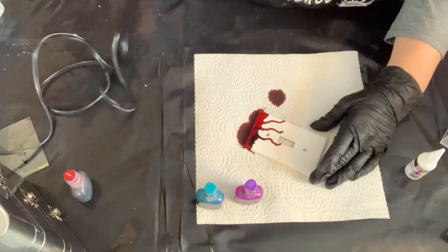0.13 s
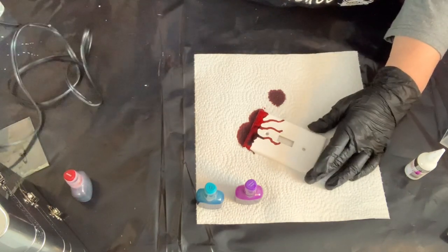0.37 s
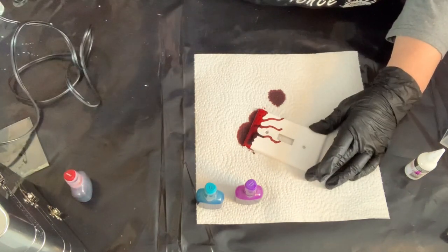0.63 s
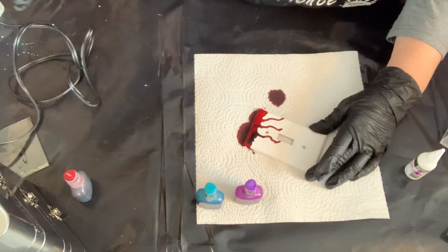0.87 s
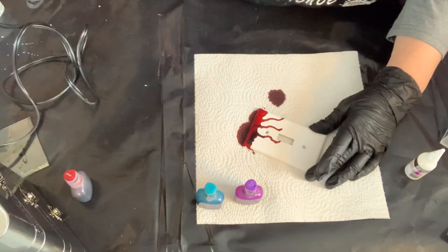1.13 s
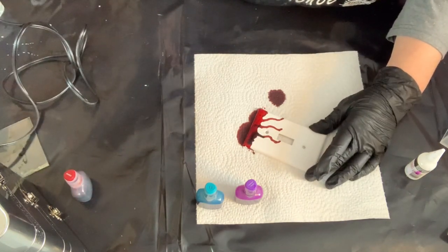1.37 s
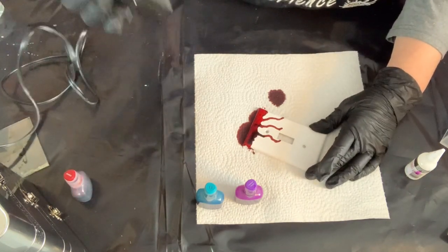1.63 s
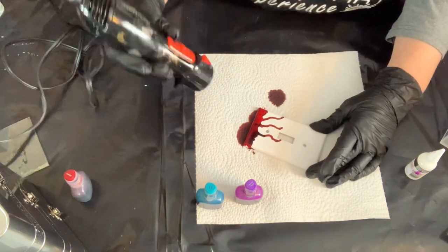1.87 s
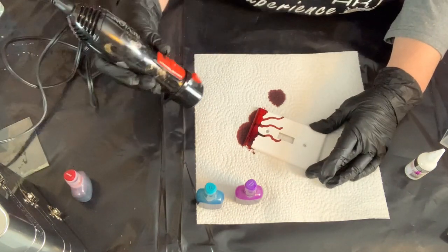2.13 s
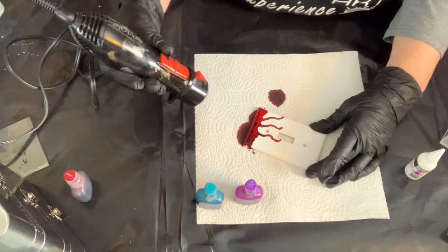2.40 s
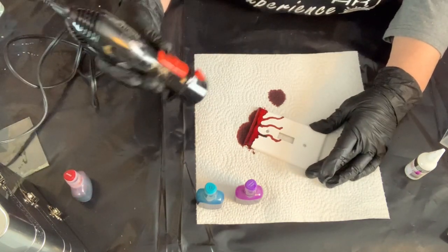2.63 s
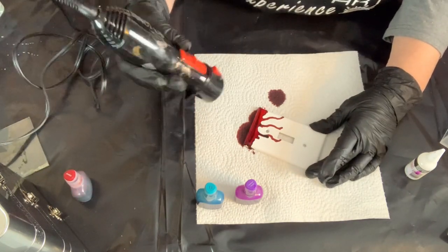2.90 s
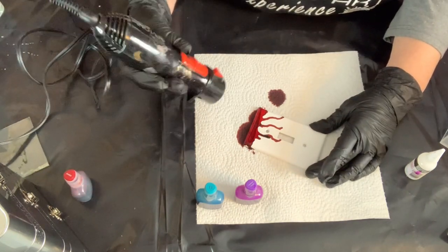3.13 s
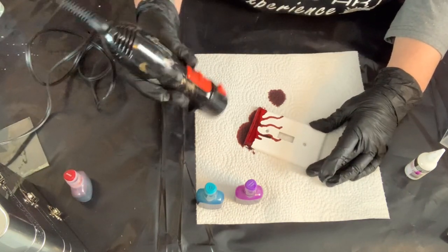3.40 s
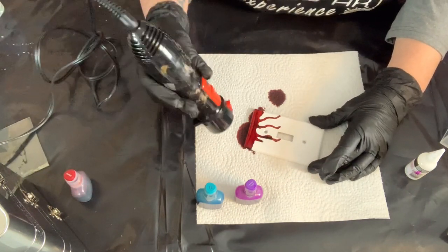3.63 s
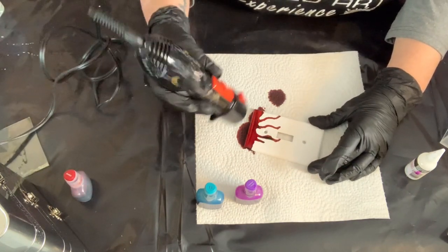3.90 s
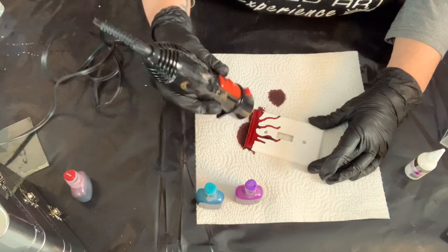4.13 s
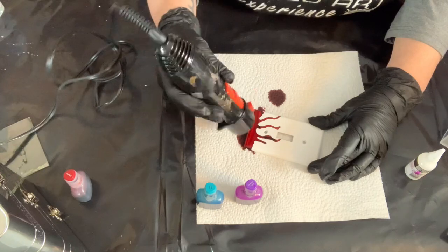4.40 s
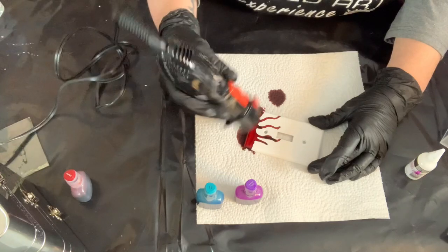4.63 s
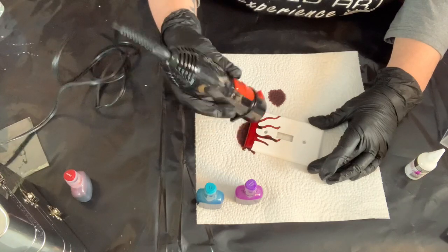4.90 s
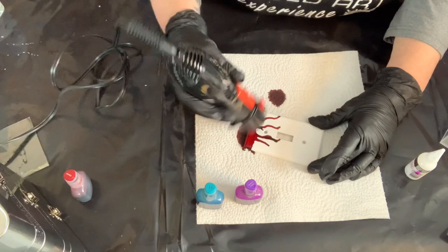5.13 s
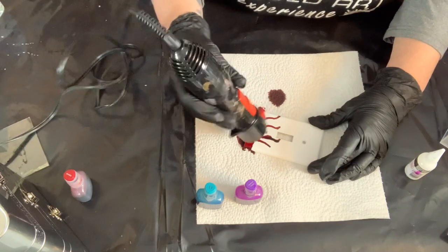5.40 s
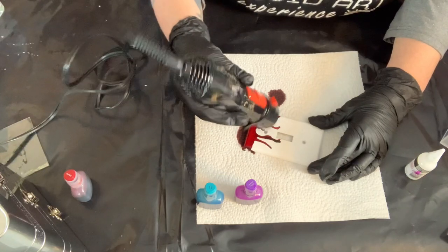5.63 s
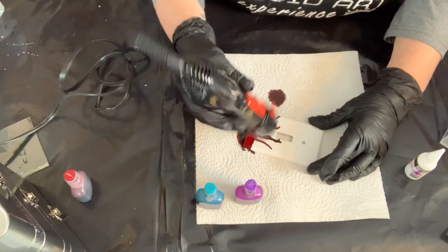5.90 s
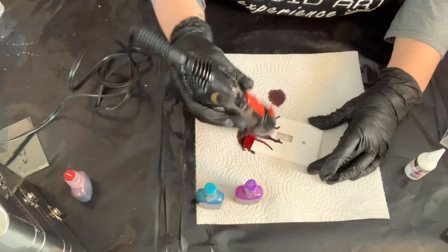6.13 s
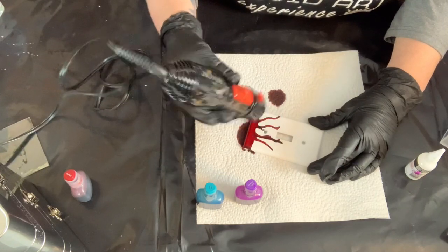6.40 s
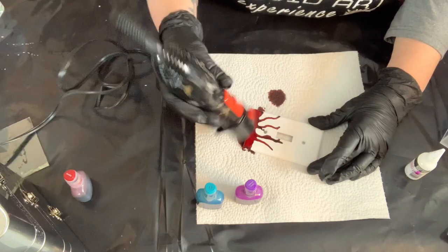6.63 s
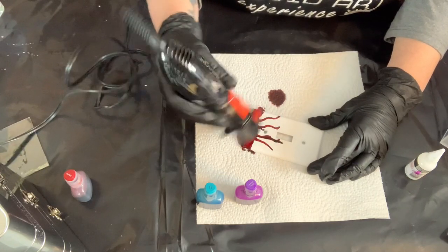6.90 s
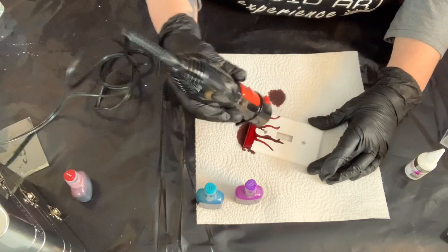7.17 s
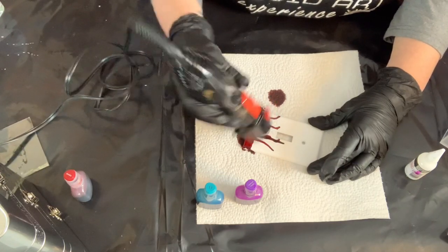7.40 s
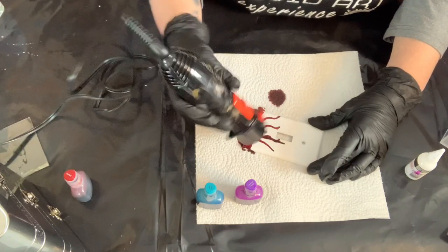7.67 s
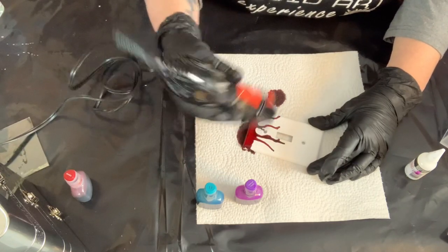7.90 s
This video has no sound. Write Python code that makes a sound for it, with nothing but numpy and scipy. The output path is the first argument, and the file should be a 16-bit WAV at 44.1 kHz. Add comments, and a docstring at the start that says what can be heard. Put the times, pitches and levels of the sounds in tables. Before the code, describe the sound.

Faint cord rustles in a quiet room, a sharp plastic click, and a little electric blower winds up quickly, then runs on with hissing air.

```python
"""First a cord scrapes, rustles and taps on a plastic sheet, over the faint hiss and rumble of a quiet room.
Then the switch of a small handheld electric blower snaps, its motor winds up, and the fan roars and hisses.
Coloured noise makes cord, air and room; ringing plastic modes make the taps and snaps; sines at multiples
of the shaft speed make the thin tones. The hand carries the tool about under a pair of microphones."""
import sys
import numpy as np
from scipy import signal
from scipy.fft import rfft, irfft, next_fast_len
from scipy.io import wavfile
from scipy.ndimage import uniform_filter1d

SR = 44100
rng = np.random.default_rng(int(sys.argv[2]) if len(sys.argv) > 2 else 0)


def digitize_waveform(pressure):
    """Quantize a signal to 16-bit integers and store it at the path in sys.argv[1].

    Rows of a 2-D input are taken as channels; values are limited to [-1, 1].
    """
    field = np.atleast_2d(pressure).T
    bounded = np.clip(field, -1, 1)
    quanta = np.round(bounded * 32767).astype(np.int16)
    wavfile.write(sys.argv[1], SR, quanta)


def amplitude_ratio(level_db):
    """Convert a level in decibels to the matching linear amplitude (field) ratio."""
    exponent = np.asarray(level_db, float) / 20
    return 10 ** exponent


N = 354123
FRAME, HOP, SIZE = 1024, 256, next_fast_len(N)  # samples
FRAME_HZ = np.fft.rfftfreq(FRAME, 1 / SR)
FRAME_S = np.arange(N // HOP + 5) * HOP / SR
TIME = np.arange(N) / SR


def evened(x):
    """Normalisation to equal power: scales to rms 1."""
    return x / np.sqrt(np.mean(np.abs(x) ** 2) + 1e-20)


def read(points, hz):
    """Pitch scale: reads a spectrum table on a log-frequency axis."""
    f, value = np.transpose(points)
    return np.interp(np.log(hz + 1), np.log(f + 1), value)


def curves(rows, t):
    """Envelopes: columns of a time table, joined by straight lines."""
    s, *columns = np.transpose(rows)
    return [np.interp(t, s, c) for c in columns]


def wander(rate, count):
    """Superposition of slow sines up to rate [Hz]: chance curves of rms 1, one a row."""
    t = np.arange(0, N, HOP) / SR
    f = np.geomspace(rate / 8, rate, 20)[:, None]
    rows = []
    for phase in rng.random((count, 20)):
        waves = np.sin(2 * np.pi * (f * t + phase[:, None])) / np.sqrt(f)
        rows.append(np.interp(TIME, t, evened(waves.sum(0))))
    return np.array(rows)


def speed(t):
    """First-order lag: share of full speed as the motor winds up exponentially."""
    start_s, wind_up_s = 1.338, .365
    return 1 - np.exp(-np.maximum(t - start_s, 0) / wind_up_s)


# the hand lowers the nozzle towards the paper and carries the tool about:
# (time [s], lowered [0-1], level of the air and housing noise [dB])
HAND = [(1.3, 0, 0), (1.7, 0, 0), (2.15, 0, 2), (2.55, 0, 0), (3.3, .05, 0), (3.7, .7, -1), (4.3, .8, 0),
        (5, .9, .5), (6, .9, -.5), (7, 1, 0), (8.03, 1, 0)]
# likeness of diffuse sound at the two microphones: (frequency [Hz], likeness [0-1])
LIKENESS = [(40, .85), (120, .94), (300, .98), (550, .92), (900, .93), (1250, .72), (1900, .88),
            (3000, .72), (4500, .5), (6000, .45)]
# balance of the microphones: (frequency [Hz], right over left [dB])
RIGHT_OVER_LEFT = [(100, .5), (700, -.8), (1300, -.3), (2400, 1.4), (4400, 3), (6500, 1), (7500, 0)]
# phase by which the right side trails besides its lag: (frequency [Hz], phase [rad])
RIGHT_TRAILS = [(40, .3), (130, .9), (300, .15), (600, 0), (1000, .4), (2000, -.3), (4000, -.7)]
# fixed resonances that colour the noise, before scaling by ringing: (frequency [Hz], width [Hz], lift [dB])
RESONANCES = [(305.8, 10, 5.5), (440, 58, 5.5), (624, 30, 5), (754, 39, 3.5), (810, 40, 2),
              (936, 45, 5), (1010, 30, -3), (1060, 30, 3), (1627, 37, 11.5), (1730, 75, 7.5),
              (1905, 24, 11.5), (2145, 120, 8.5), (2328, 24, 14.5), (2963, 102, 9), (4910, 94, 5)]
LAG_HIGH, LAG_LOW = 10, 6  # samples by which the right microphone hears later, nozzle high and low


def noise(layers, patchy_db, ringing=1):
    """Partial coherence: one patchy noise at both microphones, filtered into (spectrum, level [dB]) layers."""
    a, b, c, d, patches = rng.standard_normal((5, len(FRAME_HZ), len(FRAME_S)))
    patches = uniform_filter1d(uniform_filter1d(patches, size=8, axis=0), size=30, axis=1)
    patches = evened(patches)

    # the right side mixes a delayed left with noise of its own
    lowered = curves(HAND, FRAME_S)[0]
    lag = LAG_HIGH + (LAG_LOW - LAG_HIGH) * lowered
    trail = 2 * np.pi * FRAME_HZ[:, None] * lag / SR + read(RIGHT_TRAILS, FRAME_HZ)[:, None]
    same = np.clip(read(LIKENESS, FRAME_HZ), 0, 1)[:, None]
    left = a + 1j * b
    right = same * np.exp(-1j * trail) * left + np.sqrt(1 - same ** 2) * (c + 1j * d)
    right = right * amplitude_ratio(read(RIGHT_OVER_LEFT, FRAME_HZ))[:, None]
    patchy = np.array([left, right]) * amplitude_ratio(patchy_db * patches)
    white = signal.istft(patchy, nperseg=FRAME, noverlap=FRAME - HOP)[1][:, :N]

    hz = np.fft.rfftfreq(SIZE, 1 / SR)
    lift_db = ringing * sum(db / (1 + (2 * (hz - f) / width) ** 2) for f, width, db in RESONANCES)
    # wall echoes ripple the spectrum finely
    ripple = evened(uniform_filter1d(rng.standard_normal(len(hz)), size=100))
    ripple_db = ripple * read([(200, 2.2), (2500, 1.4), (5000, .5)], hz)
    lifted = rfft(white, SIZE) * amplitude_ratio(lift_db + ripple_db)

    out = np.zeros((2, N))
    for colour, level_db in layers:
        band = irfft(lifted * amplitude_ratio(read(colour, hz)), SIZE)[:, :N]
        out += amplitude_ratio(level_db) * evened(band)
    return out


# spectrum of the steady room hiss: (frequency [Hz], relative level [dB])
ROOM_HISS = [(120, -27), (200, 5), (711, -18), (1170, -5), (1390, -10), (1620, -5), (2020, -8),
             (12000, -35), (15600, -54), (22000, -120)]
# spectrum of the building's rumble: (frequency [Hz], relative level [dB])
RUMBLE = [(20, -55), (35, -22), (65, 4), (110, -5), (170, -13), (300, -39)]
# the rumble comes and goes, before its wander: (time [s], level [dB])
RUMBLE_LEVEL = [(0.0, -63), (0.13, -76), (0.36, -65), (0.62, -66), (0.85, -74), (1.14, -70), (1.21, -80),
                (1.54, -75), (2.06, -70), (8.03, -70)]


def quiet_room():
    """Background noise: steady hiss and a rumble whose level wanders more as the motor speeds up."""
    rumble_db = curves(RUMBLE_LEVEL, TIME)[0] + 3.0 * speed(TIME) * wander(6, count=1)[0]
    return noise([(ROOM_HISS, -79.5), (RUMBLE, rumble_db)], patchy_db=2.5, ringing=0)


# spectra of the cord's scrape and rustle: (frequency [Hz], relative level [dB])
SCRAPE, RUSTLE = [(150, -4), (400, 0), (1100, -4), (1450, -8), (1620, 4), (1780, -9), (2500, -13),
                  (4000, -26)], [(1500, -13), (3000, -4), (7000, -1.5), (11000, -4.5), (14000, -14),
                                  (16000, -24)]
# tugs of the cord over the sheet:
# (time of peak [s], scrape [dB], rustle [dB], time to rise 20 dB [s], time to fall 20 dB [s])
TUGS = [(0, -62, -74, .01, .1), (.22, -80, -63, .08, .2), (.28, -63, -80, .1, .7),
        (.29, -80, -63, .06, .13), (.514, -66, -73, .01, .2), (.594, -50, -90, .006, .13),
        (.644, -57, -75, .02, .1), (.72, -70, -64, .09, .06), (.888, -73, -67, .008, .14),
        (1.08, -82, -72, .06, .1), (1.206, -72, -72, .006, .08), (1.232, -84, -68, .05, .01)]


def dragged_cord():
    """Friction noise: each tug rises and dies exponentially, and the loudest tug sets the level."""
    s, scrape_db, rustle_db, rise, fall = np.transpose(TUGS)[:, :, None]
    shape_db = -20 * np.maximum((s - TIME) / rise, (TIME - s) / fall)
    scrape_level = np.maximum((scrape_db + shape_db).max(0), -120)
    rustle_level = np.maximum((rustle_db + shape_db).max(0), -120)
    return noise([(SCRAPE, scrape_level), (RUSTLE, rustle_level)], patchy_db=4.0, ringing=0.4)


# modes of the plastic: (frequency [Hz], level before the brightness tilt [dB], t60 [s])
PLASTIC = [(880, -4, .014), (1500, -6, .006), (2200, 0, .008), (2900, -2, .007), (3700, -4, .004),
           (4700, -2, .004), (5600, -1, .004), (6600, 0, .004), (7900, 0, .004), (9200, 0, .003),
           (10700, 0, .003), (12500, -3, .003), (14500, -8, .003)]
# taps of the cord: (time [s], direct peak [dB], brightness [0-1], t60 of the puff [s])
TAPS = [(.2932, -63, .8, .01), (0.5092, -56, 0.3, 0.017), (.5921, -42, 0, .012), (.641, -60, 0.9, .01),
        (0.8855, -55, .2, .015), (0.9866, -56, 0.5, .01), (1.1767, -62, .8, .01)]
# the switch, its finger, snap and bounces: (time [s], direct peak [dB], brightness [0-1], t60 of the puff [s])
SNAPS = [(1.206, -48, 0.3, 0.0099), (1.2375, -40, 0.7, 0.02), (1.2408, -21, 0.9, 0.01),
         (1.2465, -30, 0.9, 0.01), (1.2518, -24, 0.85, 0.012), (1.2576, -28, 0.85, 0.015),
         (1.266, -36, .85, .02), (1.2748, -24, 0.55, 0.024)]


def taps_and_switch():
    """Impact excitation: a short decaying noise puff rings the plastic's damped modes."""
    out, t = np.zeros(N), np.arange(4000) / SR
    high_pass = signal.butter(3, 650, "high", fs=SR)
    for s, db, bright, t60 in [*TAPS, *SNAPS]:
        rings = np.zeros(len(t))
        for hz, mode_db, ring_s in PLASTIC:
            tilt_db = 13 * (bright - .5) * np.log2(hz / 3000)
            decay = amplitude_ratio(mode_db + tilt_db - 60 * t / ring_s)
            rings += decay * rng.choice([-1, 1]) * np.sin(2 * np.pi * hz * t)
        puff = rng.standard_normal(1500) * amplitude_ratio(-60 * t[:1500] / max(t60, .002))
        hit = signal.lfilter(*high_pass, signal.fftconvolve(rings, puff)[:len(t)])
        out[round(s * SR):][:len(t)] += amplitude_ratio(db) * hit / abs(hit).max()
    return out


# spectra of the air and housing layers: (frequency [Hz], relative level [dB])
LOW_ROAR, DUCT, HISS = [(60, -36.5), (110, -19.5), (200, -11.5), (340, 3), (480, -5), (600, -13),
                        (900, 3.5), (2000, -28)], [(600, -20), (1000, -47), (1300, -6.5), (1550, -1.5), (1700, 3.5),
                                          (1950, -1.5), (2300, -22.5)], [(1500, -45), (3000, -4), (4500, -3), (6600, 1),
                                                        (7300, 0.5), (8200, -5.5), (10000, -0.5),
                                                        (11000, -1.5), (12000, -18), (14500, -21),
                                                        (16000, -7)]
SIZZLE, UPPER_DUCT = [(2500, -22), (4800, -12), (6600, 0), (8000, -2), (10500, -8), (13000, -25)], [(1700, -33.5), (2050, 7.5), (2350, 3.5), (2600, 5.5), (2900, -5.5),
                                      (3250, -22.5), (3600, -4), (4500, -33)]
LOW_BUZZ, HIGH_BUZZ = [(500, -43), (680, -12), (780, 4.5), (930, -0.5), (1100, -4.5), (1400, -29.5)], [(3400, -50), (3700, 22), (3800, 30), (3900, 14), (4200, -70)]
# low roar, duct, hiss, brush sizzle, upper duct, low buzz, high buzz:
# (at full speed, nozzle high [dB], rise per tenfold speed [dB], gain when lowered [dB],
#  gain around the housing's critical speed [dB], critical speed [share of full])
LAYERS = [(-41, 105, .8, 0, 0), (-38.7, 68, .3, 0, 0), (-46.3, 76, 5, 0, 0), (-56, 15, -3, 0, 0),
          (-39.5, 84, -4, 0, 0), (-40.5, 30, -9, 5, .58), (-72, 24, 10, 24, .4)]


def air_and_housing():
    """Turbulence and resonance: air, brush sizzle and shell buzz grow as powers of the motor speed."""
    share, (lowered, hand_db) = speed(TIME), curves(HAND, TIME)
    # the first current shakes rotor and air as much as this share of speed would
    kick_s, kick_share = 1.29, .22
    stir = np.maximum(share, kick_share * np.clip((TIME - kick_s) / .02, 1e-4, 1))
    shake_width = .24  # share of full speed either side of the critical one
    levels = []
    for db, rise_db, low_db, shake_db, critical in LAYERS:
        shake = np.exp(-((share - critical) / shake_width) ** 4)
        levels.append(hand_db + db + rise_db * np.log10(stir) + low_db * lowered + shake_db * shake)
    colours = [LOW_ROAR, DUCT, HISS, SIZZLE, UPPER_DUCT, LOW_BUZZ, HIGH_BUZZ]
    return noise(zip(colours, levels), patchy_db=1.32)


# the first turns of the rotor ring the housing purely:
# (time [s], length [s], frequency [Hz], direct rms at full swell [dB])
JOLTS = [(1.313, 0.02, 905, -51), (1.385, 0.026, 877, -43.5), (1.443, 0.012, 864, -43),
         (1.491, 0.0109, 906, -44.5), (1.531, .014, 885, -44)]


def rotor_jolts():
    """Transient resonance: each jolt is a short pure sine with tapered ends."""
    out = np.zeros(N)
    for s, length, hz, db in JOLTS:
        t = np.arange(0, length, 1 / SR)
        ring = signal.windows.tukey(len(t), .5) * np.sin(2 * np.pi * hz * t)
        out[round(s * SR):][:len(t)] += amplitude_ratio(db) * np.sqrt(2) * ring
    return out


# shaft speed the motor heads for, creeping up as it warms: (time [s], speed [Hz])
FULL_SPEED = [(3.3, 351.4), (4.1, 350.8), (4.7, 351.5), (5.4, 352.2), (6.5, 352.4), (8.03, 352.1)]
# shaft tones, before their sway:
# (multiple of shaft speed, rms at full speed [dB], rise per tenfold speed [dB], gain when lowered [dB])
TONES = [(7, -49.5, 70, .5), (10, -65, 200, 4), (11, -70, 40, 13), (15, -67, 90, 9), (1, -51, 170, 0),
         (13, -65.5, 170, 0), (14, -63, 170, 0), (25, -60, 300, 0), (26, -62, 300, 0), (27, -50, 300, 0),
         (29, -57, 300, 0), (30, -64, 300, 0), (31, -61.5, 300, 0), (43, -67, 300, 0)]
# one tone swells or fades for a moment as the tool turns:
# (time [s], multiple, gain [dB], half length [s])
SWELLS = [(2.05, 11, 13, .1), (2.2, 7, 6, .1), (2.35, 11, 15, .1), (2.65, 11, 16, .1), (3.15, 10, 7, .35),
          (3.34, 11, 20, .27), (3.35, 7, -6, .2), (4.5, 11, 6, 1.2), (4.85, 11, 3.5, .5), (4.55, 10, 9, .5),
          (5.2, 10, 9, .25), (5.9, 7, -3, .3), (6.6, 10, 9, .4), (6.75, 11, 5, .4), (7.6, 10, 4, .3),
          (7.6, 11, 3, .2)]


def shaft_tones():
    """Harmonics of rotation: waving the tool makes level and phase wander at each microphone."""
    share, lowered = speed(TIME), curves(HAND, TIME)[0]
    unsteady = 1 + 0.0013 * wander(30, count=1)[0]
    turns = np.cumsum(share * curves(FULL_SPEED, TIME)[0] * unsteady) / SR
    sway = wander(25, count=12)
    out = np.zeros((2, N))
    for i, (k, db, rise_db, low_db) in enumerate(TONES):
        swell_db = sum(gain_db * np.clip(2 * (1 - abs(TIME - s) / half), 0, 1)
                       for s, multiple, gain_db, half in SWELLS if multiple == k)
        level_db = db + rise_db * np.log10(share + 1e-4) + low_db * lowered + swell_db
        w = sway[(i * 5 + np.arange(4)) % 12]  # two rows sway the levels, two the phases
        side_db = np.array([[0], [read(RIGHT_OVER_LEFT, k * FULL_SPEED[-1][1])]])
        phase = 2 * np.pi * k * turns + i * i + .7 * w[2:]
        out += np.sqrt(2) * amplitude_ratio(level_db + side_db + 2.0 * w[:2]) * np.sin(phase)
    return out


def room(x, t60=0.15, wet_db=-4.0):
    """Reverberation: direct sound, later at the right, and a sparse decaying tail [s] for each side."""
    grid = np.arange(60, SR // 2, 20)
    at = grid + rng.integers(0, 20, (2, len(grid)))
    echoes = rng.choice([-1., 1.], at.shape) * amplitude_ratio(-60 * at / SR / t60)
    response = np.zeros((2, SR // 2 + 20))
    np.put_along_axis(response, at, echoes, 1)
    response *= amplitude_ratio(wet_db) / np.linalg.norm(response[0])
    response[[0, 1], [0, LAG_HIGH]] = 1
    return signal.fftconvolve(x[None], response, axes=1)[:, :N]


def scene():
    """Superposition: all sources add at the two microphones."""
    knocks = room(taps_and_switch() + rotor_jolts())
    return quiet_room() + dragged_cord() + knocks + air_and_housing() + shaft_tones()


def low_pass(x):
    """Removes everything above the highest recorded frequency."""
    return signal.sosfilt(signal.butter(12, 16480, fs=SR, output="sos"), x)


# part of the left channel copied into the right: (frequency [Hz], share [0-1])
COPY = [(5800, 0), (6500, .85), (7500, .95), (9400, .97), (11000, .92), (12500, .98), (16000, .96)]
# phase by which the copy leads: (frequency [Hz], phase [rad])
LEAD = [(6000, -.4), (7500, -.2), (8300, .9), (9450, 3.1), (10900, 5.7), (12000, 7.2), (12550, 8.8),
        (13700, 10), (14600, 12.2), (16000, 13.5)]


def record(dry):
    """Interchannel coherence: the right treble becomes a phase-shifted copy of the left; both ends roll off."""
    hz, (left, right) = np.fft.rfftfreq(SIZE, 1 / SR), rfft(dry, SIZE)
    copy = read(COPY, hz)
    shifted = np.exp(1j * curves(LEAD, hz)[0]) * left
    right = copy * shifted + np.sqrt(1 - copy ** 2) * right
    # (frequency [Hz], gain [dB])
    edge = amplitude_ratio(read([(20, -25), (45, 0), (15000, 0), (15200, -7), (15700, -10), (15850, -60)], hz))
    mix = irfft(np.array([left, right]) * edge, SIZE)[:, :N]
    return low_pass(mix)


dry = scene()
out = record(dry)
digitize_waveform(out)
```